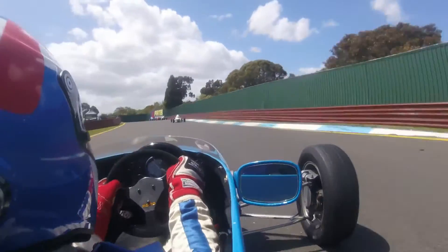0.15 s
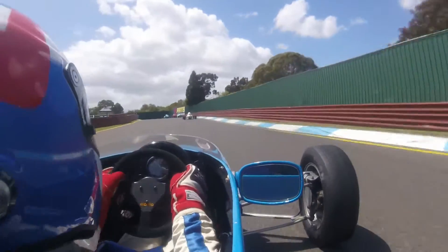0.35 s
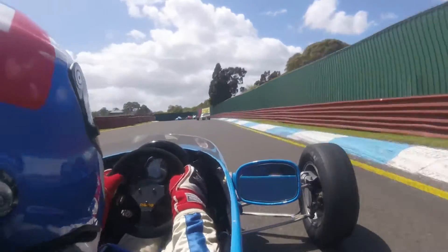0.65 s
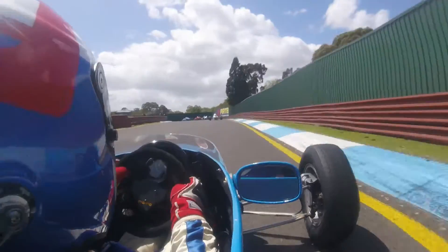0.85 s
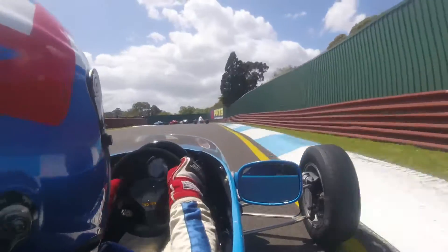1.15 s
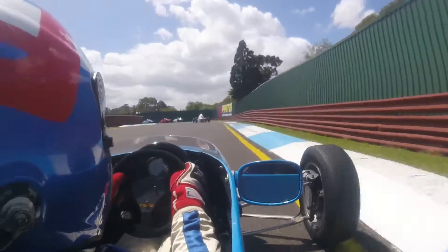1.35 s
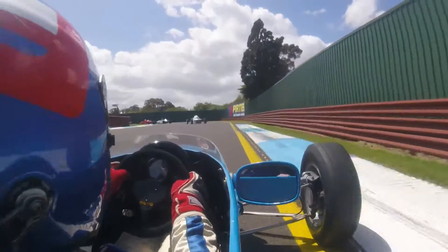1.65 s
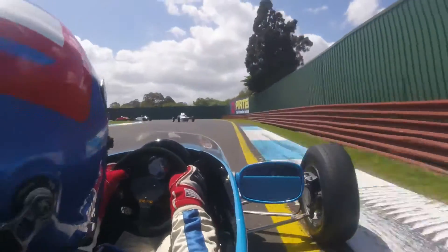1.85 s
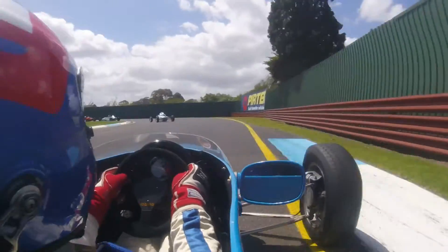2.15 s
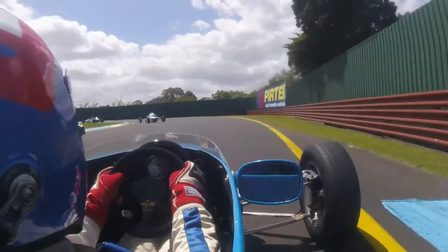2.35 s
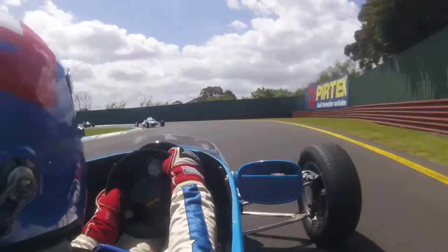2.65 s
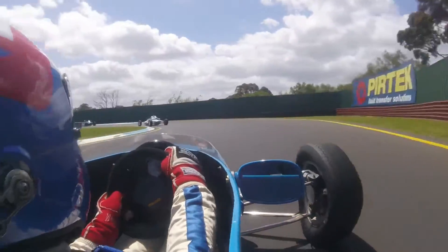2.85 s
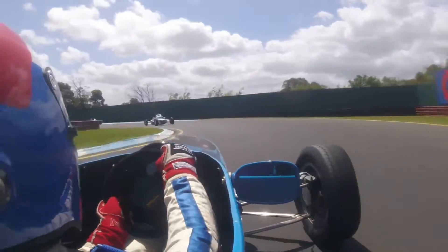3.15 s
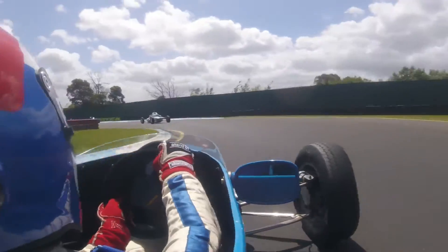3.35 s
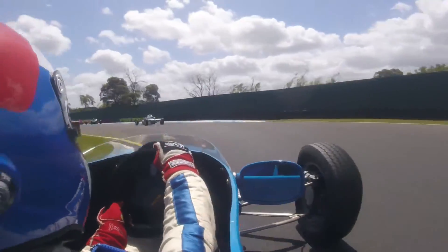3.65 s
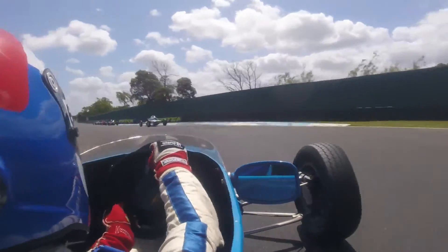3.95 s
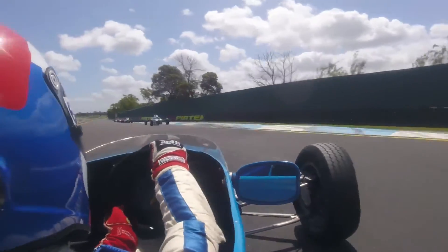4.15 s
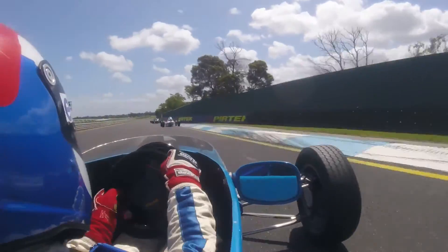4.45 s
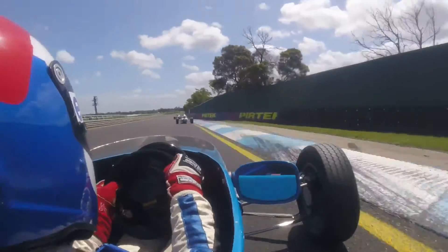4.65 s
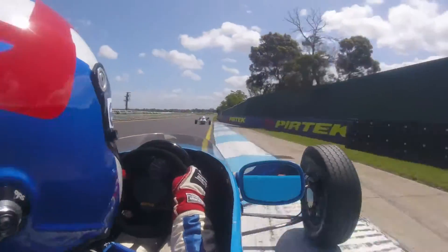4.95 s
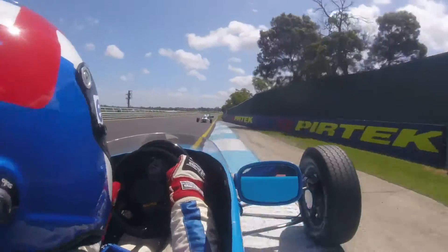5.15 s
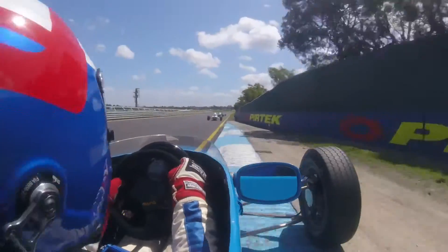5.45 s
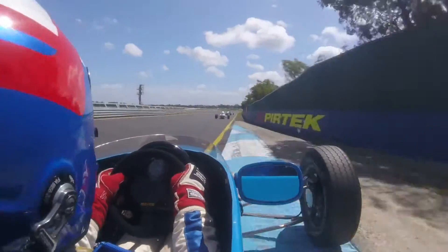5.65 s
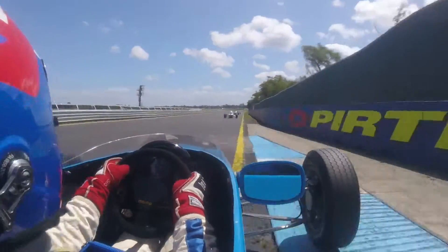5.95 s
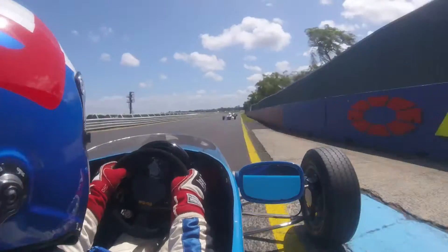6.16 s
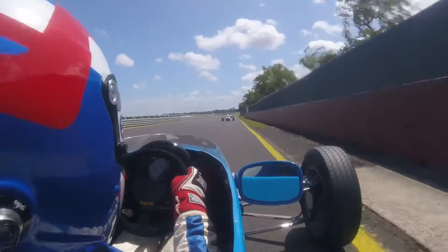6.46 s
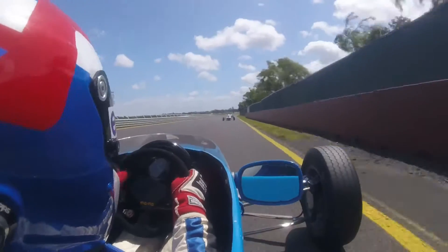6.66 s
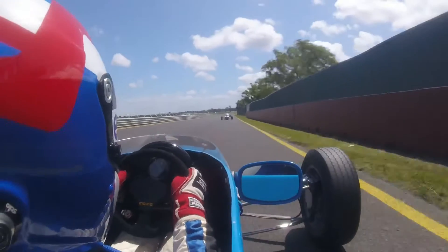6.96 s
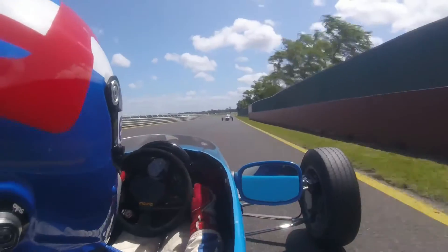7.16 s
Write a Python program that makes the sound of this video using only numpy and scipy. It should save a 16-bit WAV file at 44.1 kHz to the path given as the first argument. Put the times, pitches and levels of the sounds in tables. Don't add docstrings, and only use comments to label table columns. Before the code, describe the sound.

A small four-cylinder racing car is heard on board, through a cased microphone fixed to its frame, dry and close. At 0 s the engine is already high, a loud, nearly pure low boom with buzzing panel overtones, fine metallic valve ticking and dull road and wind roar. It climbs until about 0.9 s, then from 1.4 s the throttle shuts; pitch slides down until 2.5 s, weakening and stuttering over bumps. Power returns near 2.7 s and a steady lower drone holds from 3 to 4.3 s, with slight gear whine and loose knocks around 3.6 and 4.1 s. Kerb thuds strike from 4.4 to 5 s, with a sharp grit click at 5.1 s and the heaviest thumps near 5.3 and 5.5 s. Revs flare, then rise smoothly to the end at 7.3 s, the boom cutting briefly around 6.4 s and faltering afterwards, with one knock at 7 s.

```python
import sys
import numpy as np
from scipy import signal
from scipy.io import wavfile
from scipy.ndimage import uniform_filter1d, minimum_filter1d

SR = 44100
rng = np.random.default_rng(int(sys.argv[2]) if len(sys.argv) > 2 else 0)


def transcribe(signal):
    frames = np.atleast_2d(signal).T
    limited = np.clip(frames, -1, 1)
    pcm = np.round(limited * 32767).astype(np.int16)
    wavfile.write(sys.argv[1], SR, pcm)


def makeup_ratio(level_db):
    decades = np.asarray(level_db, float) / 20
    return 10 ** decades


N = 321930

# time in seconds, firings per second.
FIRING = [(0.0, 199.5), (0.4, 204.5), (0.72, 214), (0.92, 216.5), (1.15, 213.5), (1.38, 196.5),
          (1.68, 186.5), (1.8, 175.5), (2.2, 154), (2.52, 140), (2.9, 144), (2.96, 155), (4.27, 154.3),
          (4.38, 158.5), (5.32, 168.5), (5.72, 176.5), (6.3, 190), (7.3, 212)]
# centre in seconds,
# change in firings per second, width in ms.
FLARES = [(.2, 2, 30), (.52, 2, 30), (1.52, 4, 50), (1.76, -4, 30), (1.88, 4, 30), (1.96, -5, 25),
          (2.7, 2, 40), (2.97, 2, 25), (3.22, 2, 60), (4.6, -3, 35), (4.9, 5, 50), (5.04, -2.5, 30),
          (5.2, 9, 45), (5.82, 2, 40), (6.18, 11, 50), (6.53, 4.5, 90)]
OVERRUN_S = (1.36, 2.62)
OVERRUN_LOSS_DB = 6
HUNT_HZ, OVERRUN_HUNT_HZ = .45, 1.5
# centre in seconds, depth in dB, width in ms.
FALTERS = [(0.106, 7, 18), (0.207, 6, 27), (0.493, 4.5, 14.5), (1.273, 2.5, 15), (1.411, 4.5, 11),
           (1.6, 3, 22), (1.721, 9, 34), (1.838, 6, 13), (1.95, 5, 63), (2.015, 12, 9.4), (2.079, 6, 26.5),
           (1.781, 9, 9.4), (2.393, 7, 36), (2.462, 29, 17), (2.536, 5.5, 74), (2.6, 3.5, 50),
           (5.051, 5.5, 9.4), (5.124, 8, 15), (5.478, 7.5, 14.8), (5.911, 6, 16), (2.2, 7.5, 15),
           (6.356, 12, 15), (6.448, 27, 28), (6.529, 18, 15), (6.749, 7, 23), (6.834, 12, 18),
           (6.898, 9.5, 14), (7.004, 5, 21), (7.126, 8.5, 29), (7.297, 10.5, 50)]
RIPPLES = [.557, 1.189, 2.279, 3.57, 5.354, 5.577, 5.843, 6.016, 6.11, 6.29, 6.489, 6.585, 7.062, 7.19]
RIPPLE_DB, RIPPLE_MS = 4.5, 14
# time in seconds, firing tone in the mount in dB rms.
LOAD = [(0, -6), (1.85, -7), (2.05, -11), (2.45, -19), (2.65, -14.5), (2.9, -13), (3.03, -8.5), (4.7, -8.5),
        (5.1, -7.5), (5.6, -8), (6.7, -6.5), (7.3, -6.5)]
# time in seconds, slap level in dB rms.
PLAY = [(0, -27.5), (.33, -25), (.5, -33.5), (.72, -36), (.85, -29), (1.55, -25), (1.7, -30), (2.6, -35),
        (2.68, -23.5), (4.48, -27), (4.56, -47), (5.08, -26), (5.2, -37.5), (5.88, -47), (6.0, -27.5),
        (6.55, -34.5), (6.75, -25), (7.3, -39.5)]
# firings per second, half order in dB, 1.5 order in dB,
# third order above slap in dB, panel buzz in dB.
FRAME = [(146, -43, -35.5, -30.5, -45), (154, -43, -30.5, -14, -38.5), (160.3, -35, -32.5, -8, -40.5),
         (172, -39.5, -40, -1, -40.5), (187, -48.5, -51.5, -7, -38.5), (218, -48, -51, -2, -35.5),
         (211.6, -57.5, -55.5, -2.5, -39)]
# frequency in Hz, level in dB.
PANEL = [(500, 24.5), (620, 0.5), (750, -5.5), (900, -1), (1080, -1), (1250, -18.5), (1900, -19.5),
         (2400, -23)]
BUZZ_FOLLOWS = 0.17
# time in seconds, level in dB.
WHINE = [(0, -64), (2.95, -64), (3.1, -52), (4.4, -51), (5.1, -49), (5.5, -52), (5.9, -62), (7.3, -64)]
MESH_ORDER = 18
# order per firing, start in seconds, end in seconds.
SPELLS = [(1 / 3, .85, 1.15), (2 / 3, .8, 1.2), (4, .33, .85), (4, 1.05, 1.34), (6, .8, 1.05), (6, 0, .55),
          (9, .3, 1.3), (.5, 2.85, 3.25), (.5, 4.45, 4.85), (3, 4.7, 5.15), (5, 4.78, 5.15), (7, 4.8, 5.12),
          (8, 4.8, 5.05), (.5, 5.5, 5.82), (3.5, 5.8, 6.08), (4, 5.78, 6.02), (3, 5.8, 5.93),
          (6, 6.45, 6.85), (4, 6.7, 7.4), (2, 7.0, 7.4), (1.5, 2.62, 3.05), (1.5, 4.2, 4.95),
          (5, 2.7, 2.95), (4, 2.3, 2.6), (3, 6.25, 6.42), (3, 1.75, 1.95)]
SPELL_DB = [-37, -31, -29.5, -29.5, -40.5, -46, -50.5, -35, -26.5, -36, -37.5, -39.5, -42, -31, -32.5,
            -33.5, -33, -46.5, -31.5, -38, -32.5, -33.5, -44, -35.5, -36.5, -56]
# time in seconds, ticking level in dB.
THROTTLE = [(0, -53), (.3, -52), (.9, -45), (1.3, -44), (1.4, -48.5), (2.0, -53.5), (2.5, -48.5),
            (2.64, -49.5), (2.72, -44), (3.7, -43.5), (5.08, -45.5), (5.16, -47.5), (5.75, -47.5),
            (5.85, -46), (6.1, -44.5), (6.3, -51.5), (6.7, -46), (7.3, -43)]
PARTS_HZ = [3010, 3620, 4150, 4540, 4920, 5080, 5225, 5410, 5610, 5800, 6570, 6790, 7900, 8970]
# ring width in Hz, level in dB, gain in dB per 30 more firings per second.
PARTS = [(50, -7, -3), (60, -8, -2.5), (60, -6, 2), (84.5, -3.5, -1.5), (70, -0.5, -1.5), (64, -2, -5.5),
         (35, 3.5, 3.5), (90, -1.5, -3.5), (120, 0, -0.5), (1370, -12.5, 1.5), (150, -21.5, -8.5),
         (700, -24.5, -3.5), (300, -30, 3), (200, -29, -0.5)]
# frequency in Hz, density in dB per Hz.
CASE = [(25, -65.5), (55, -56.5), (230, -49.5), (400, -57), (680, -59.5), (1400, -69.5), (5500, -84),
        (11000, -118)]
# time in seconds, roar change in dB.
ROAD = [(0, 2.5), (.7, 2), (1.04, 0), (1.25, 0), (1.4, -3), (1.5, -1), (1.9, -6.5), (2.45, -4), (3.0, -1.5),
        (4.35, 0.5), (4.55, 4.5), (4.72, 3.5), (5.09, 4.5), (5.13, 0.5), (5.75, 0), (5.85, 1.5), (6.2, -1),
        (7.3, 1.5)]
ROAR_FOLLOWS = [0.61, 0.15, 0.85, .9]
LUMPY_DB = 1
# centre in seconds, width in ms, tyre rumble gain in dB, seat grumble gain in dB.
PATCHES = [
    (.2, 87, 6, 2.9),
    (1.9, 150, 5, 1),
    (2.4, 140, 3, 6),
    (2.95, 56, 1, 2),
    (4.549, 200, 2.5, 5.5),
    (5.302, 300, 6, 6.5),
    (6.45, 200, 3.5, 3.5),
    (7.2, 160, 4, 3),
    (4.152, 240, 4.5, 1.7),
]
# time in seconds, peak in dB.
STONES = [
    (.8669, -43),
    (5.1093, -27),
    (6.101, -42),
    (4.655, -44),
]
# start in seconds, peak in dB, pitch in Hz, ring width in Hz.
KNOCKS = [
    (3.5663, -23, 1300, 250),
    (4.121, -19, 1300, 250),
    (4.6453, -18, 1000, 600),
    (5.1093, -22, 1500, 900),
    (7.0263, -17, 1230, 180),
    (7.0255, -30, 2050, 300),
]
# start in seconds, peak in dB, pitch in Hz, ring width in Hz.
THUDS = [(4.445, -22, 300, 90), (4.644, -12.5, 325, 109.9), (4.801, -15, 403, 110), (4.898, -26, 500, 111),
         (4.973, -29, 340, 90), (4.99, -23, 55, 25), (5.326, -6.5, 300, 70), (5.478, -21, 65.4, 30),
         (5.482, -6.5, 260, 90), (5.571, -31, 300, 90), (5.817, -32, 550, 70)]


def in_time(rows):
    s, *columns = np.transpose(rows)
    return [np.interp(np.arange(N) / SR, s, c) for c in columns]


def at_hz(points, hz):
    points_hz, db = np.transpose(points)
    return np.interp(np.log(hz), np.log(points_hz), db)


def rms_one(x):
    return x / np.sqrt(np.mean(x ** 2) + 1e-20)


def drift(rate_hz):
    r = np.exp(-80 * np.pi * rate_hz / SR)
    coarse = rng.standard_normal(N // 40 + 2002)
    slow = signal.lfilter([1], [1, -2 * r, r * r], coarse)[2000:]
    return np.interp(np.arange(N) / 40, np.arange(len(slow)), rms_one(slow))


def bump(s, width_ms):
    coarse = np.arange(0, N, 64)
    hump = np.exp(-.5 * ((coarse / SR - s) * 1000 / width_ms) ** 2)
    return np.interp(np.arange(N), coarse, hump)


def resonance(x, hz, width_hz):
    r = np.exp(-np.pi * width_hz / SR)
    zeros = np.array([1, 0, -1]) * (1 - r * r) / 2
    return signal.lfilter(zeros, [1, -2 * r * np.cos(2 * np.pi * hz / SR), r * r], x)


def overrun():
    corners_s = np.add(np.repeat(OVERRUN_S, 2), [-.06, .06, -.06, .06])
    return np.interp(np.arange(N) / SR, corners_s, [0, 1, 1, 0])


def revs():
    hunt = (HUNT_HZ + OVERRUN_HUNT_HZ * overrun()) * drift(12)
    flares = sum(extra * bump(s, width_ms) for s, extra, width_ms in FLARES)
    return in_time(FIRING)[0] + flares + hunt


def contact():
    t, firm = np.arange(0, N, 32) / SR, 1
    for s, depth_db, width_ms in FALTERS + [(s, RIPPLE_DB, RIPPLE_MS) for s in RIPPLES]:
        notch = np.exp(-.5 * ((t - s) / (width_ms / 1800)) ** 2)
        firm = firm * (1 - (1 - makeup_ratio(-abs(depth_db))) * notch)
    return np.interp(np.arange(N) / SR, t, firm)


def order(phase, level_db, flutter_db, wander_rad, rate_hz=29.0):
    level = np.sqrt(2) * makeup_ratio(level_db + flutter_db * drift(rate_hz))
    return level * np.cos(phase + wander_rad * drift(4.1))


def boom(turn, level_db):
    return order(turn, level_db, flutter_db=.55, wander_rad=.04, rate_hz=30)


def slap(turn, second_db, third_db):
    second = order(2 * turn - .2, second_db, flutter_db=2.6, wander_rad=.3, rate_hz=20)
    third = order(3 * turn + .9, third_db, flutter_db=3.0, wander_rad=.4, rate_hz=20)
    return second + third


def uneven_firing(turn, half_db, uneven_db):
    half = order(turn / 2, half_db, flutter_db=-1.5, wander_rad=.15)
    return half + order(3 * turn / 2, uneven_db, flutter_db=4.0, wander_rad=.38)


def panel_buzz(turn, firing_hz, buzz_db):
    buzz = 0
    for k in range(4, 12):
        level_db = buzz_db + at_hz(PANEL, k * firing_hz)
        buzz = buzz + order(k * (turn + k), level_db, flutter_db=.5, wander_rad=.14)
    return buzz


def gear_whine(turn):
    return order(MESH_ORDER * turn, in_time(WHINE)[0], flutter_db=1.5, wander_rad=.35)


def engine(turn, firing_hz):
    load_db, slap_db = in_time(LOAD)[0], in_time(PLAY)[0]
    speeds_hz, *passed = np.transpose(FRAME)
    half_db, uneven_db, third_db, buzz_db = [np.interp(firing_hz, speeds_hz, c) for c in passed]
    buzz_db = buzz_db + BUZZ_FOLLOWS * (load_db - np.median(load_db)) - OVERRUN_LOSS_DB * overrun()
    firm = contact()
    mounted = firm * boom(turn, load_db) + firm ** 2 * slap(turn, slap_db, slap_db + third_db)
    uneven = uneven_firing(turn, half_db, uneven_db)
    return mounted + uneven + firm * panel_buzz(turn, firing_hz, buzz_db) + gear_whine(turn)


def bounces(turn):
    t, out = np.arange(N) / SR, np.zeros(N)
    flutter = makeup_ratio(2.1 * np.array([drift(14), drift(7.4), drift(12)]))
    for k, ((share, start, end), level_db) in enumerate(zip(SPELLS, SPELL_DB)):
        now = (t > start) & (t < end)
        swell = np.sin(np.pi * (t[now] - start) / (end - start)) ** 0.36
        tone = np.sqrt(2) * makeup_ratio(level_db) * np.cos(share * turn[now])
        out[now] += swell * flutter[k % 3][now] * tone
    return out


def valves(turn, firing_hz):
    fired = np.diff(np.floor(turn / (2 * np.pi) - .3), prepend=0) > 0
    ticks = 0.45 * rms_one(fired * makeup_ratio(2.2 * rng.standard_normal(N)))
    loose = makeup_ratio(1.6 * np.minimum(rng.exponential(1, N), 5)) * rng.choice([-1, 1], N)
    loose = rms_one(loose * makeup_ratio(2.8 * np.cos(turn - 2.2) + 0.9 * drift(12)))
    dealt = rng.integers(0, len(PARTS), N)
    rings, speed = 0, (firing_hz - 180) / 30
    for k, (hz, (width_hz, db, speed_db)) in enumerate(zip(PARTS_HZ, PARTS)):
        drive = (-1) ** k * ticks + np.sqrt(len(PARTS)) * loose * (dealt == k)
        gain = makeup_ratio(db + speed_db * speed + 0.5 * drift(1.9))
        rings = rings + gain * resonance(drive, hz, width_hz)
    return makeup_ratio(in_time(THROTTLE)[0] + 2.0) * rms_one(rings)


def roar_levels():
    tyre, seat, frame, wind = [share * in_time(ROAD)[0] for share in ROAR_FOLLOWS]
    for s, width_ms, tyre_db, seat_db in PATCHES:
        hump = bump(s, width_ms)
        tyre, seat = tyre + tyre_db * hump, seat + seat_db * hump
    return tyre + LUMPY_DB * drift(2.7), seat, frame, wind


def roar(turn):
    together_db = 1.3 * (.7 * drift(7) + .6 * drift(25))
    edges_hz = 20 * 2 ** np.arange(0, 9.3, .4)
    white = rng.standard_normal((2, N)) * np.sqrt(SR / 2)
    swings_db = [c - np.mean(c) for c in roar_levels()]
    out = 0
    for k, (low, high) in enumerate(zip(edges_hz, edges_hz[1:])):
        hz = np.sqrt(low * high)
        place = np.interp(np.log(hz), np.log([100, 200, 330, 500, 1000, 2200]), [0, 1, 1, 2, 2, 3])
        swing_db = sum(max(1 - abs(place - j), 0) * c for j, c in enumerate(swings_db))
        pulse_db = 0.4 * min(hz / 900, 1) * np.cos(turn - 3.5)
        gain = makeup_ratio(at_hz(CASE, hz) + swing_db + pulse_db + together_db + 0.26 * drift(24))
        band = signal.butter(2, [low, high], "band", fs=SR, output="sos")
        out = out + gain * signal.sosfilt(band, white[k % 2])
    return out


def grit():
    clicks = np.zeros(N)
    for s, peak_db in STONES:
        clicks[round(s * SR)] = makeup_ratio(peak_db + 9)
    scatter = rng.choice([-1, 1], 90) * np.exp(-np.arange(90) / 22)
    high = signal.butter(2, 2000, "high", fs=SR, output="sos")
    return signal.sosfilt(high, np.convolve(clicks, scatter)[:N] + 1e-18)


def blows(rows):
    out, t = np.zeros(N), np.arange(3000) / SR
    for s, peak_db, hz, width_hz in rows:
        push = (t == 0) + 0.043 * rng.standard_normal(len(t)) * np.exp(-t / 0.0013)
        ring = resonance(resonance(push, hz, width_hz), hz, 2 * width_hz)
        ring = makeup_ratio(peak_db) * ring / np.abs(ring).max()
        piece = out[round(s * SR):][:len(t)]
        piece += ring[:len(piece)]
    return out


def linkage_knocks():
    return blows(KNOCKS)


def kerb_thuds():
    return blows(THUDS)


def scene():
    firing_hz = revs()
    turn = 2 * np.pi * (np.cumsum(firing_hz) / SR - 1 / 4)
    car = engine(turn, firing_hz) + bounces(turn) + valves(turn, firing_hz)
    return (car + roar(turn) + grit() + linkage_knocks() + kerb_thuds())[None]


def roll_off(x):
    return signal.sosfilt(signal.butter(12, 11400, fs=SR, output="sos"), x)


def record(dry):
    peak = -minimum_filter1d(-np.abs(dry), size=441, axis=1)
    held = dry * uniform_filter1d(np.minimum(1, .87 / peak), size=221, axis=1)
    dull = signal.sosfilt(signal.butter(2, 7500, fs=SR, output="sos"), held)
    dull = signal.sosfilt(signal.butter(8, 10300, fs=SR, output="sos"), dull)
    return roll_off(dull)


dry = scene()
out = record(dry)
transcribe(out)
```